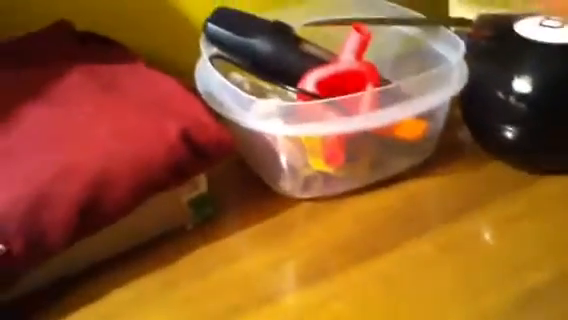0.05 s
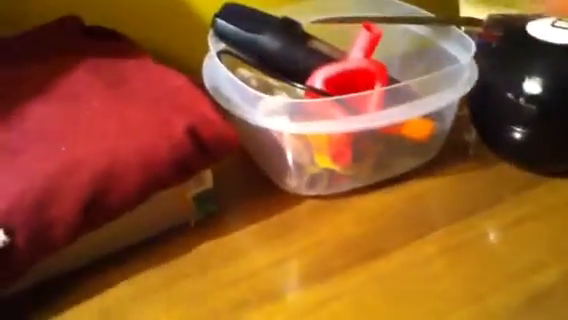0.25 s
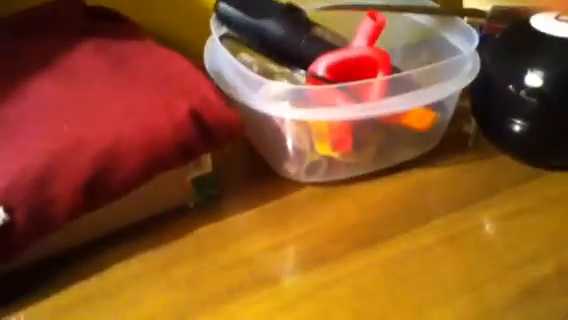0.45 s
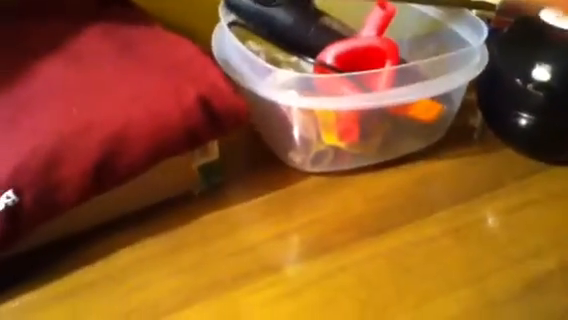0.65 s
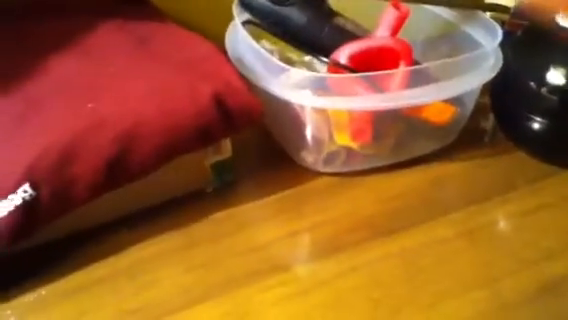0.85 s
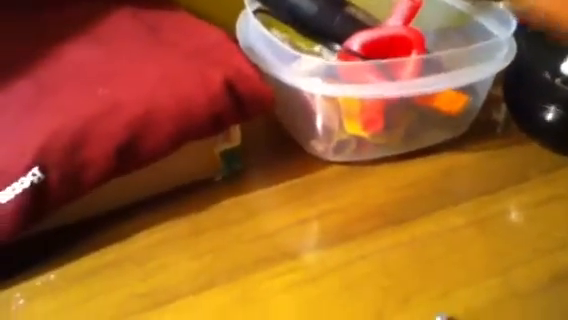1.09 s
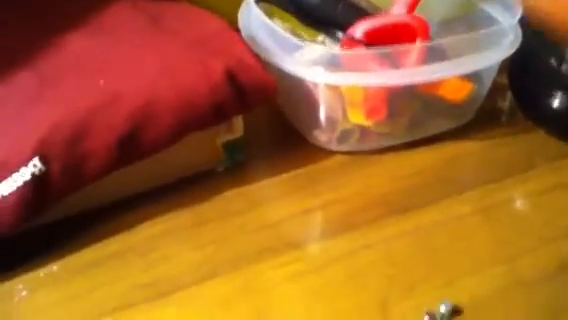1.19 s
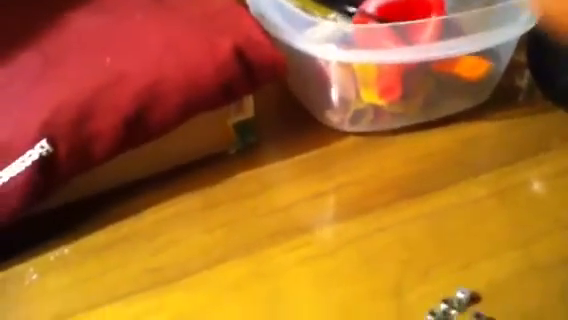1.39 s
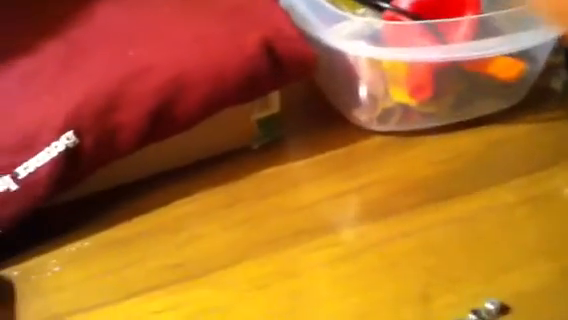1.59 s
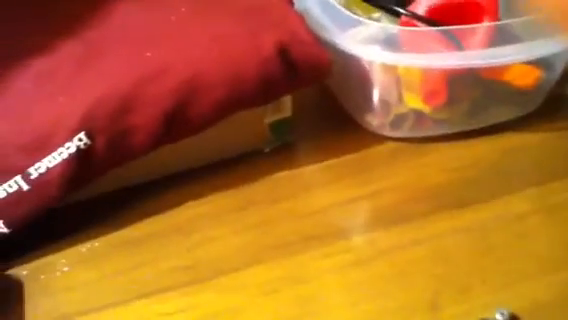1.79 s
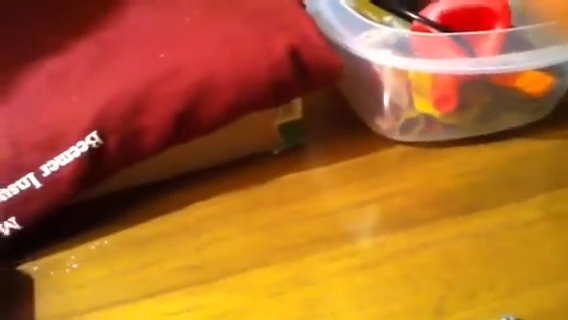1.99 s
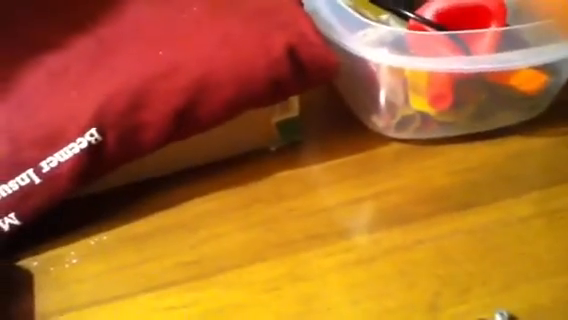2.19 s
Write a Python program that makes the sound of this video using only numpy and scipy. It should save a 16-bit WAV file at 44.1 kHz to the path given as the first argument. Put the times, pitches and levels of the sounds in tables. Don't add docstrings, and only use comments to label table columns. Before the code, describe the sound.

A small metal pellet clicks sharply into a shell, then dull knocks on a wooden table

```python
import sys
import numpy as np
from scipy import signal
from scipy.fft import rfft, irfft
from scipy.io import wavfile
from scipy.ndimage import uniform_filter1d

SR = 44100
rng = np.random.default_rng(int(sys.argv[2]) if len(sys.argv) > 2 else 0)


def natural_amplitude(level_db):
    exponent = np.asarray(level_db, float) / 20
    return 10 ** exponent


def to_wav(s):
    ch = np.atleast_2d(s).T
    pcm = np.round(np.clip(ch, -1, 1) * 32767)
    wavfile.write(sys.argv[1], SR, pcm.astype(np.int16))


N = 99225

# f/Hz, level/dB [per Hz]
FLOOR_SPECTRUM = [(12, -62), (20, -31), (59, -1.5), (145, 2.5), (468, -6.5), (509, -8.5), (554, -13.5),
                  (8300, -19), (15800, -22.5)]
# f/Hz, t60/s
ROOM_DECAY = [(250, .35), (1000, 0.27), (3000, 0.25), (7000, 0.2), (14000, .15)]
# start t/s, length/s, slip rate/Hz, level/dB
CREAKS = [
    (.775, .11, 85, -47.5),
    (0.966, .06, 80, -48.5),
]
# start t/s, length/s, level/dB, centre f/Hz, share through the table [0-1]
SCRAPES = [
    (.160, 0.029, -67.5, 1640, .01),
    (.2335, 0.0088, -47, 7000, 0.07),
    (1.53, 0.055, -62.5, 4500, 0.65),
    (1.577, 0.05, -62, 4470, 0.5),
]
# f/Hz, level/dB, t60/s
WOOD_MODES = [(215, -17.5, 0.055), (260.5, -1, 0.19), (303, -1.5, .12), (329, 6, 0.036), (347.7, -3, 0.15),
              (392, -2, 0.094), (428.2, 1, 0.14), (501, -10, 0.096), (579, -12.5, 0.081)]
# f/Hz, level/dB, t60/s
BOARD_MODES = [(790, -2, 0.071), (864, -3, 0.058), (936, -2, 0.083), (1121, -4, 0.056), (1260, -2, 0.039),
               (1413, -1.5, 0.043), (1573, 1.5, 0.053), (1770, -3, 0.02), (2085, 0.5, 0.019),
               (2290, -14.5, 0.032)]
# f/Hz, level/dB, t60/s
SHELL_MODES = [(586, -4, .05), (712, -12, 0.039), (838, -3, 0.039), (978, -5, 0.078), (1108, -8, 0.052),
               (1322, -9.5, 0.062), (1588, -2, 0.044), (1787, -9, 0.074), (1990, 2.5, 0.043),
               (2080, -5, 0.076), (2237, -1, 0.045), (2470, 1, 0.027), (2610, -2, .05), (2780, -7, 0.035)]
# f/Hz, level/dB, t60/s
PELLET_MODES = [(3123, 3.5, 0.0089), (3500, -4, 0.015), (4180, -2, 0.011), (4750, -5, 0.011),
                (5350, 1.5, 0.0081), (5890, -4, 0.013), (6100, 2, 0.014), (7260, -11.5, 0.012),
                (7300, -17, 0.016), (8700, -13, 0.0084), (9550, -7, 0.011), (11610, -11.5, 0.01),
                (14300, -14, .011)]
# t/s, wood level/dB, board level/dB, tick level/dB
KNOCKS = [(0.915, -46.5, -60.5, -70), (.9390, -46.5, -61.5, -84), (1.004, -51, -65, -70),
          (1.0312, -55, -50, -65), (1.0496, -28, -41.5, -53.5), (1.0951, -27, -32, -46),
          (1.0978, -33.5, -46, -49), (1.1231, -28.5, -36.5, -54), (1.1470, -31.5, -48.5, -54),
          (1.1720, -42.5, -67, -60), (1.21, -43, -65, -77), (1.2720, -45.5, -64, -73),
          (1.4830, -29.5, -41.5, -46), (1.4930, -56, -42.5, -52), (1.5050, -49, -50, -61),
          (1.5160, -51, -52, -63)]
# t/s, wood level/dB, shell level/dB, click level/dB, click colour f/Hz
DROPS = [(0.2382, -24.5, -25, -11, 3500), (0.2391, -26, -24.5, -9, 5500), (.2400, -27, -46, -9, 4040),
         (0.2421, -25, -21, -22, 4000), (0.2449, -37, -25.5, -21, 3500), (0.249, -37.5, -44, -21, 4470),
         (0.267, -32.5, -34, -27, 5370), (0.2966, -33, -24, -19.5, 3500), (0.2981, -41.5, -40, -25, 4600),
         (.3030, -40, -28, -23, 6050), (.3200, -42, -26, -19.5, 6000), (0.323, -56, -34, -38.5, 4250),
         (.3290, -52, -32, -36, 3000)]

SPOT_DB, DETUNE = 1.6, 0.01
WOOD_RISE_S = 0.0017
RATTLE_DB, RATTLE_HZ, RATTLE_WIDTH_HZ, RATTLE_T60_S = -7.5, 1640, 1530, 0.065


def evened(x):
    return x / np.sqrt(np.mean(x ** 2) + 1e-20)


def read(points, hz):
    f, value = np.transpose(points)
    return np.interp(np.log(hz + 1), np.log(f + 1), value)


def add(mix, start_s, sound):
    part = mix[round(start_s * SR):][:len(sound)]
    part += sound[:len(part)]


def resonate(x, hz, width_hz):
    r = np.exp(-np.pi * width_hz / SR)
    return signal.lfilter([1 - r, 0, r - 1], [1, -(1 + r * r) * np.cos(2 * np.pi * hz / SR), r * r], x)


def ring(modes, chance=0, rise_s=0.0001, shade_db=0, detune=0, turn=-1):
    t = np.arange(SR // 4) / SR
    hz, db, t60 = np.transpose(modes)[:, :, None]
    count = len(hz)
    spot = (chance * np.ones(40))[:, None]
    hz = hz * (1 + detune * spot[20:20 + count])
    sign = -float(turn) ** np.arange(count)[:, None]
    decay_db = 60 * t / np.maximum(t60, 0.003)
    envelope = natural_amplitude(db + shade_db + SPOT_DB * spot[:count] - decay_db)
    waves = sign * envelope * np.sin(2 * np.pi * hz * t)
    return waves.sum(0) * (1 - np.exp(-t / rise_s))


def burst(noise, hz, width_hz, t60):
    coloured = resonate(resonate(noise, hz, width_hz), hz, 2 * width_hz)
    return evened(coloured) * natural_amplitude(-60 * np.arange(len(noise)) / SR / t60)


def floor():
    level_db, lump_db, lump_hz = -57, 1.4, 260
    frames, hz = N // 128 + 8, np.fft.rfftfreq(512, 1 / SR)
    a, b = rng.standard_normal((frames, 257, 2)).T
    lumps = evened(uniform_filter1d(rng.standard_normal(frames), 8))
    nearness = np.exp(-np.log2((hz[:, None] + 1) / lump_hz) ** 2)
    z = (a + 1j * b) * natural_amplitude(lump_db * lumps * nearness)
    x = signal.istft(z, nperseg=512, noverlap=384)[1][:N]
    spectrum = natural_amplitude(read(FLOOR_SPECTRUM, np.fft.rfftfreq(N, 1 / SR)))
    return natural_amplitude(level_db) * evened(irfft(rfft(x) * spectrum, N))


def room(x):
    taps = np.zeros(SR // 2)
    at = np.arange(200, len(taps) - 16, 16)
    taps[at + rng.integers(0, 16, len(at))] = rng.choice([-1., 1.], len(at))
    hz, t, z = signal.stft(taps, SR, nperseg=256)
    decay = natural_amplitude(-60 * t / read(ROOM_DECAY, hz)[:, None])
    tail = signal.istft(z * decay, SR, nperseg=256)[1]
    return signal.fftconvolve(x, tail / np.linalg.norm(tail))[:N]


def creak(start, length, rate, db):
    hz, width_hz, jitter_db = 167, 145, -1.5
    t = np.arange(SR // 5) / SR
    steps = np.diff(np.floor(t * rate + 1), prepend=0)
    slips = steps * (t < length) * natural_amplitude(jitter_db * rng.standard_normal(len(t)))
    swing = resonate(resonate(slips, hz, width_hz), hz, 2 * width_hz)
    return start, natural_amplitude(db) * swing / np.abs(swing).max()


def scrape(start, length, db, hz, share):
    grains_per_s, wood_db, board_db, q = 2800, 3, -0.5, 0.97
    t = np.arange(SR // 10) / SR
    catches = 1. * (rng.random(len(t)) < grains_per_s / SR)
    grains = rng.standard_normal(len(t)) * (1.5 + 15 * uniform_filter1d(catches, size=12))
    grains = grains * np.sin(np.pi * np.clip(t / length, 0, 1))
    hiss = evened(resonate(resonate(grains, hz, hz / q), hz, 2 * hz / q))
    wood = evened(signal.fftconvolve(grains, ring(WOOD_MODES)))
    board = evened(signal.fftconvolve(grains, ring(BOARD_MODES)))
    out = share * (natural_amplitude(wood_db) * wood + natural_amplitude(board_db) * board)
    add(out, 0, hiss)
    return start, natural_amplitude(db) * out


def knock(row, chance):
    start, wood_db, board_db, tick_db = row
    wood = natural_amplitude(wood_db - 6.5) * ring(WOOD_MODES, chance[:40], WOOD_RISE_S, turn=0.97)
    board = natural_amplitude(board_db - 6) * ring(BOARD_MODES, chance[40:80], 0.00051, 0, DETUNE)
    tick = burst(chance[120:], 4000, 3200, 0.034)
    rattle = burst(np.roll(chance, 700), RATTLE_HZ - 300, RATTLE_WIDTH_HZ, RATTLE_T60_S)
    out = wood + board
    add(out, 0, natural_amplitude(tick_db) * tick)
    add(out, 0, natural_amplitude(board_db + RATTLE_DB - 7.5) * rattle)
    return start, out


def drop(row, chance):
    start, wood_db, shell_db, click_db, hz = row
    clatter_db, snap_db, snap_hz = -3.5, -14.5, 10000
    octaves_off = abs(np.log2(np.array(PELLET_MODES)[:, :1] / hz))
    shade_db = -19.5 * octaves_off
    wood = natural_amplitude(wood_db - 5) * ring(WOOD_MODES, chance[:40], WOOD_RISE_S, turn=0.99)
    shell = natural_amplitude(shell_db - 7.5) * ring(SHELL_MODES, chance[40:80], 0.0002, 0, DETUNE)
    click = natural_amplitude(click_db - 2.5) * ring(PELLET_MODES, chance[80:120], 0.00011, shade_db, DETUNE)
    clatter = burst(chance[120:], hz, 1900, 0.025)
    rattle = burst(np.roll(chance, 700), RATTLE_HZ, RATTLE_WIDTH_HZ, RATTLE_T60_S)
    snap = burst(chance[:119:-1], snap_hz, snap_hz / 2, 0.01)
    out = wood + shell + click
    add(out, 0, natural_amplitude(click_db - 4.5 + clatter_db) * clatter)
    add(out, 0, natural_amplitude(shell_db + RATTLE_DB) * rattle)
    add(out, 0, natural_amplitude(click_db + snap_db) * snap)
    return start, out


def scene():
    table_low_hz, room_db = 193, -14
    background, near, grip = floor(), np.zeros(N), np.zeros(N)
    for row in CREAKS:
        add(grip, *creak(*row))
    for row in SCRAPES:
        add(near, *scrape(*row))
    for row, chance in zip(KNOCKS, rng.standard_normal((len(KNOCKS), 2400))):
        add(near, *knock(row, chance))
    for row, chance in zip(DROPS, rng.standard_normal((len(DROPS), 2400))):
        add(near, *drop(row, chance))
    near = signal.sosfilt(signal.butter(4, table_low_hz, "high", fs=SR, output="sos"), near)
    return (near + natural_amplitude(room_db) * room(near) + grip + background)[None]


def roll_off(x):
    return signal.sosfilt(signal.butter(12, 15920, fs=SR, output="sos"), x)


def record(dry):
    duck_from_db, duck_share, recover_db_per_s, edge_hz = -32.5, 0.17, 1.5, 15800
    power_db = 10 * np.log10(abs(uniform_filter1d(dry[0] ** 2, 400, origin=199)) + 1e-12)
    recovery_db = np.arange(N) * recover_db_per_s / SR
    cut_db = duck_share * np.maximum(power_db - duck_from_db, 0)
    cut_db = np.maximum.accumulate(cut_db + recovery_db) - recovery_db
    ducked = dry / natural_amplitude(uniform_filter1d(cut_db, 400, origin=199))
    band = signal.firwin(1023, edge_hz, window=("kaiser", 9), fs=SR)[None]
    mix = signal.oaconvolve(ducked, band, "same")
    return roll_off(mix)


dry = scene()
out = record(dry)
to_wav(out)
```